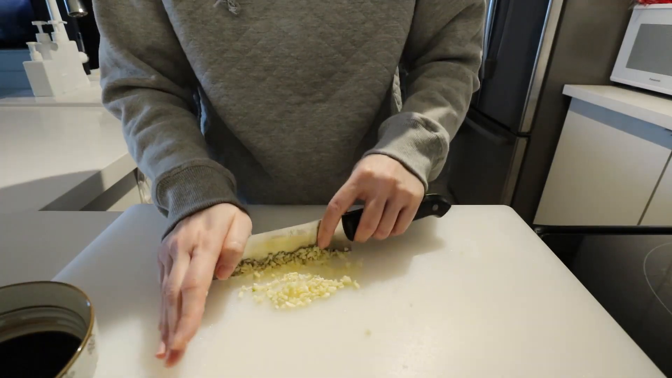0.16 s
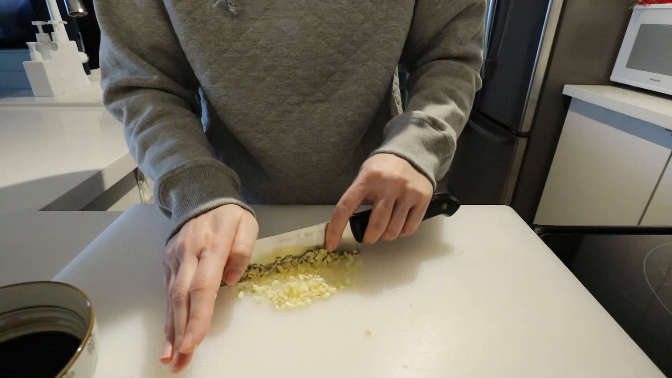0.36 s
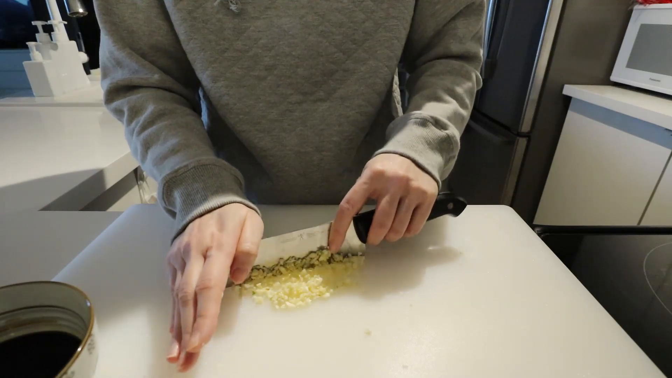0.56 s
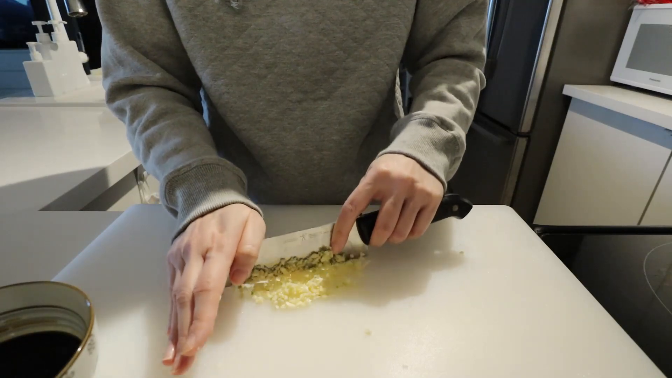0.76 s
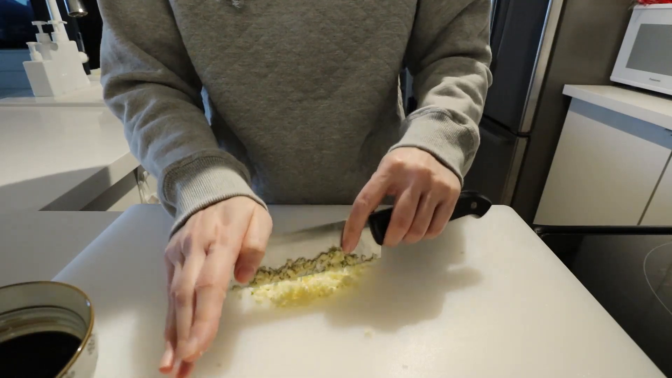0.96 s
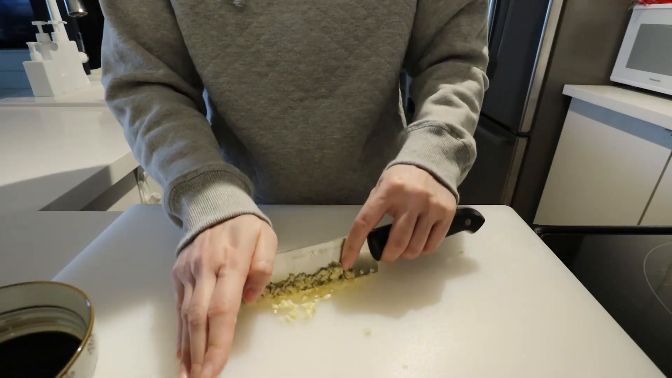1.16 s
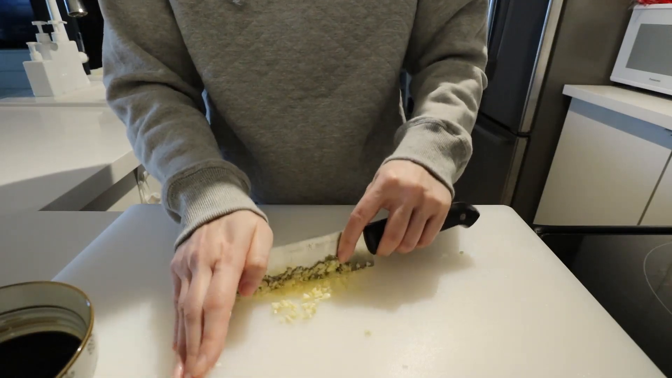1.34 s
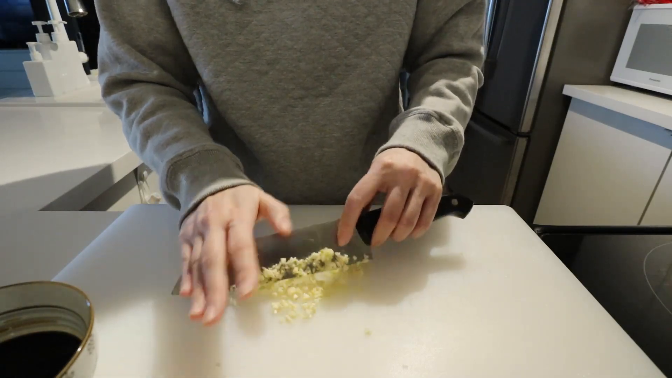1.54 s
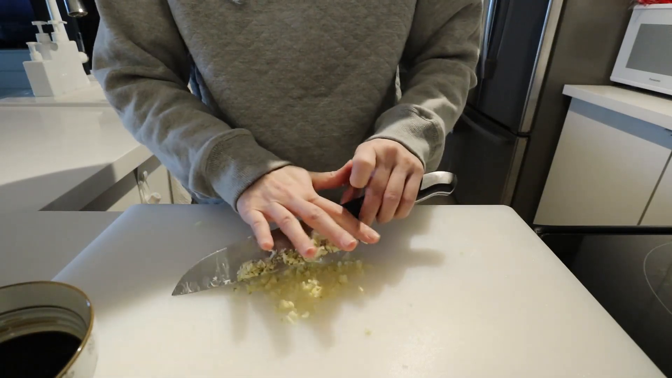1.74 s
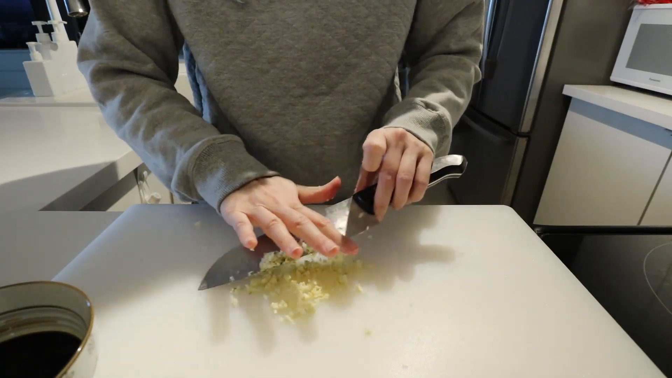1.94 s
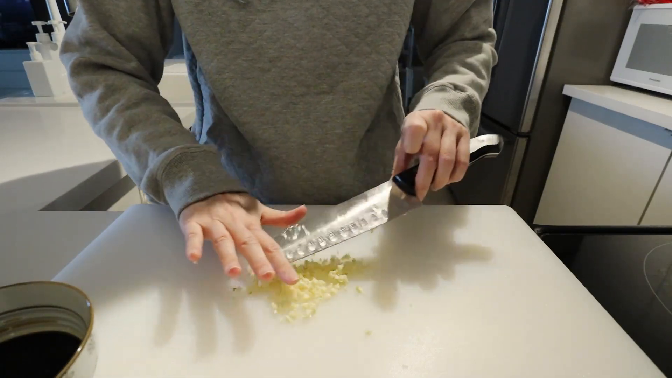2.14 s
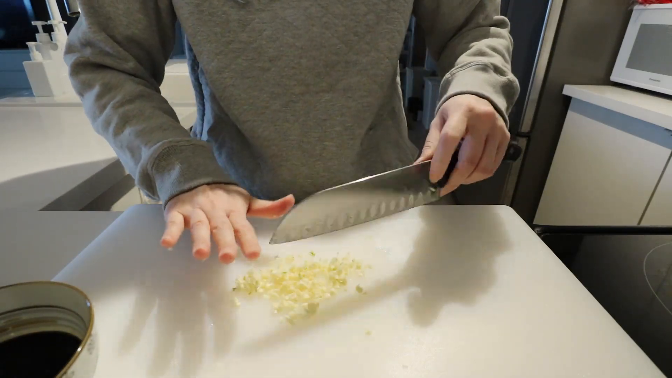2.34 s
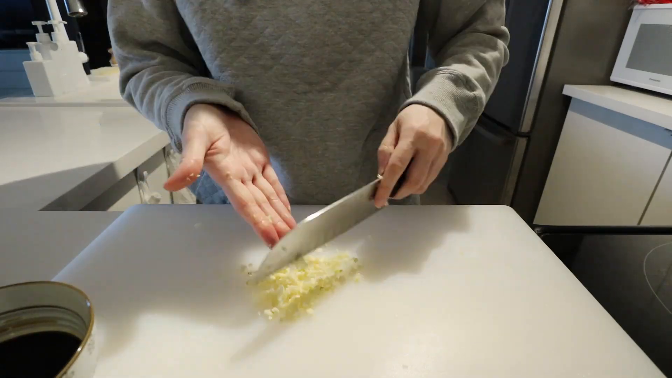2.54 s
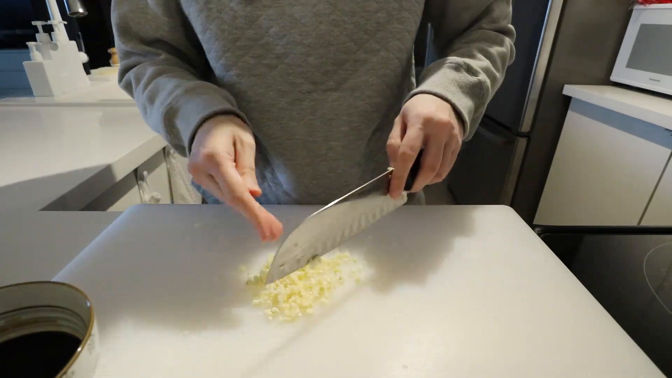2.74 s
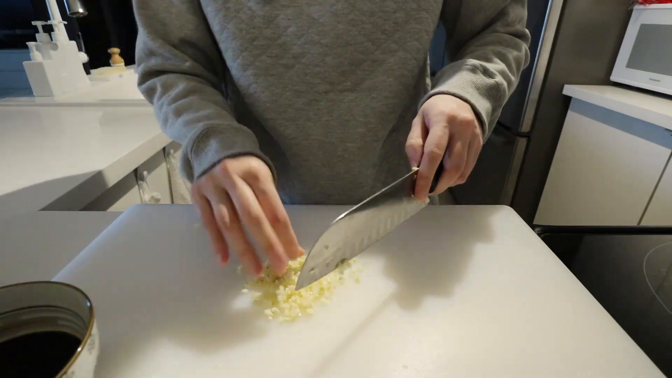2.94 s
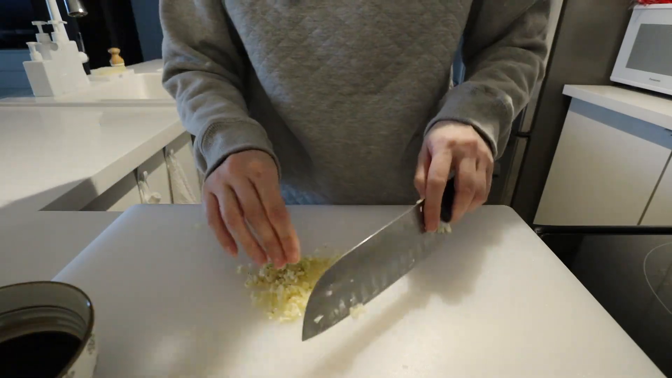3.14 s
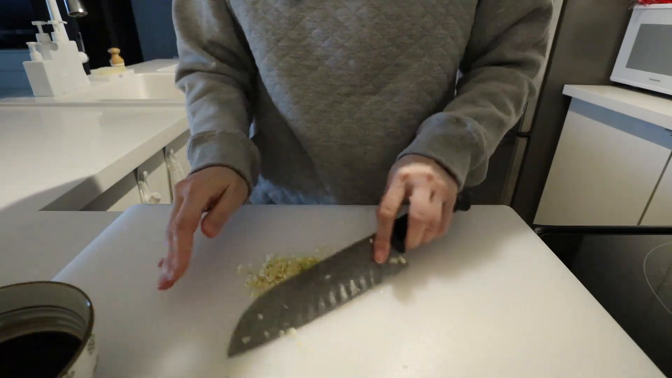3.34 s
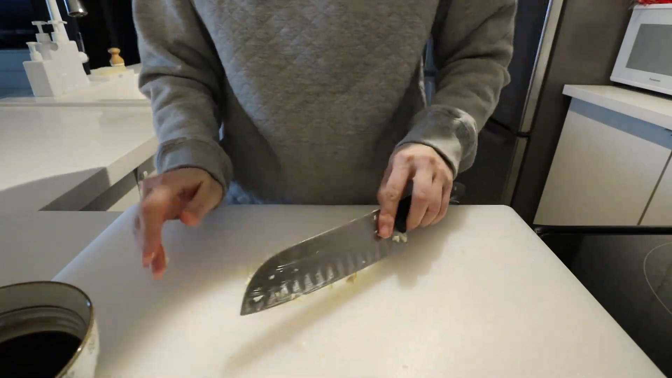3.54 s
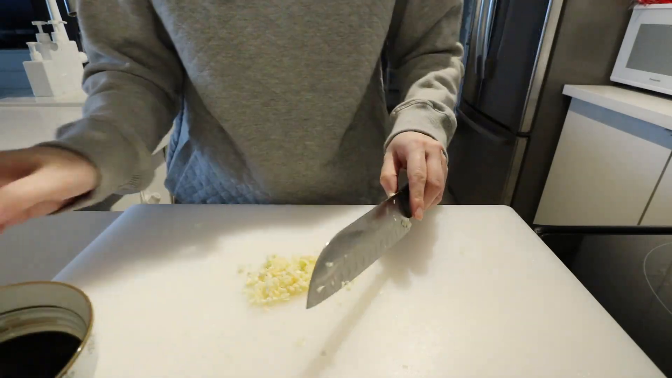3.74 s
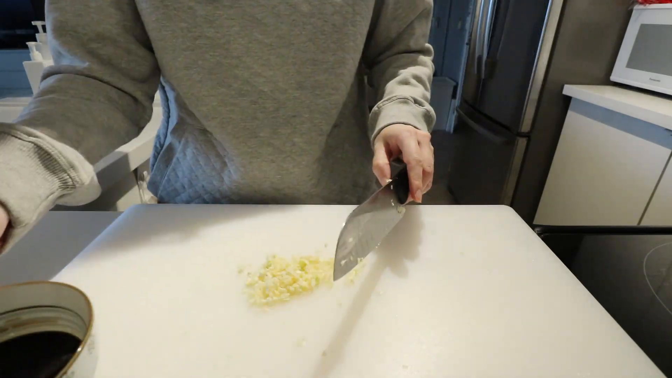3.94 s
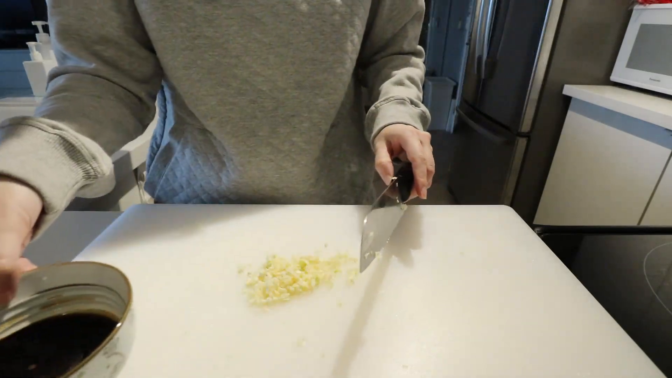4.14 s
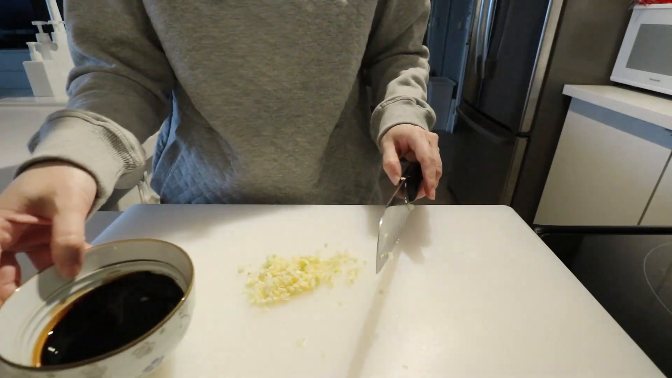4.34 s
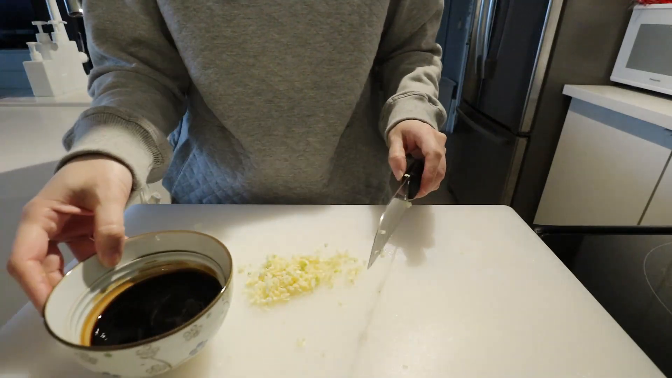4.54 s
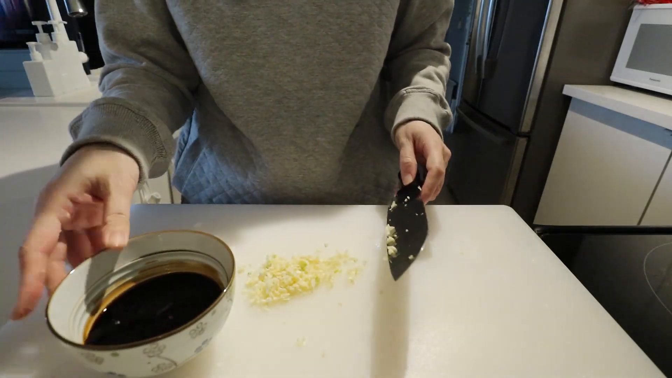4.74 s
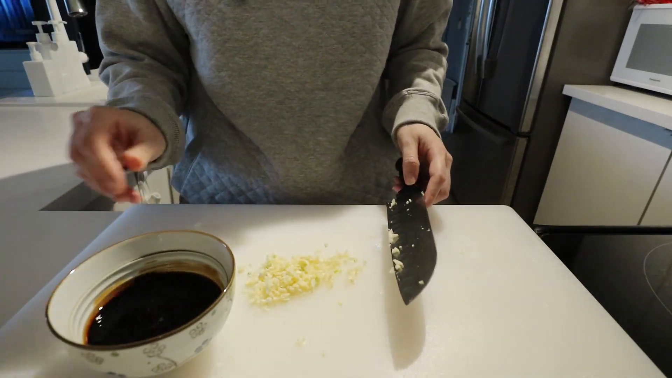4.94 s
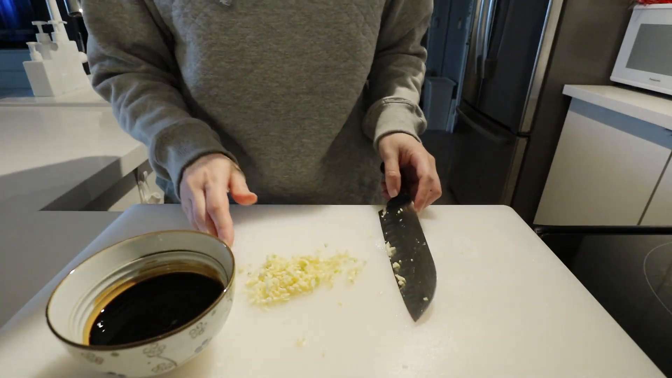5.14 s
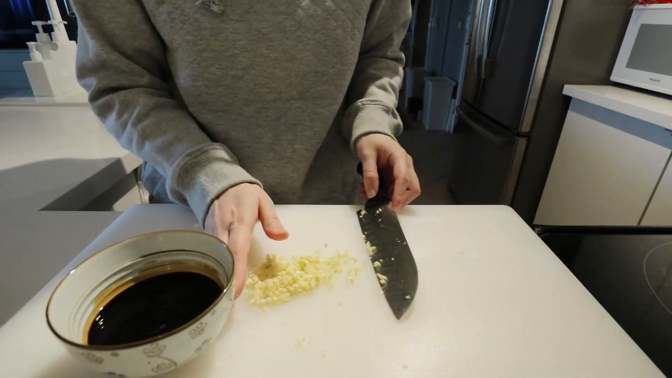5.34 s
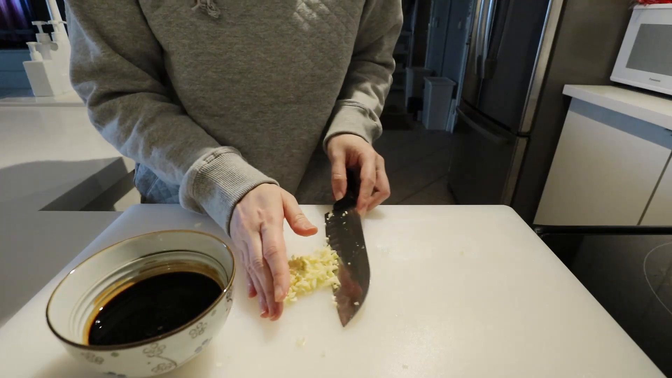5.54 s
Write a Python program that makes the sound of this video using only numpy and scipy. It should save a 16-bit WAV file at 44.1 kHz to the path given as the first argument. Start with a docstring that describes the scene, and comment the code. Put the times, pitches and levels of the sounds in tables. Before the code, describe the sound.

A knife raps sharply through garlic on a cutting board, followed by quiet blade wiping, a bowl scooting over the counter and light scraping.

```python
"""Seven knife chops through garlic on a plastic board in a small kitchen, then a wiped blade and a scraping edge.
A ceramic bowl is dragged over the counter and rings faintly when let go; the knife is set down and sweeps up.
Blows, jolts and thuds excite decaying modes; rubbing is random slips through body modes and a spectrum.
Filtered noise makes taps and air, wavering sines the fridge hum, decaying noise bands the room echo.
A gain control ducks at the hardest blow and slowly comes back."""
import sys
import numpy as np
from scipy import signal
from scipy.fft import rfft, irfft, next_fast_len
from scipy.io import wavfile
from scipy.ndimage import uniform_filter1d, minimum_filter1d

SR = 44100
rng = np.random.default_rng(int(sys.argv[2]) if len(sys.argv) > 2 else 0)


def wav_record(signal):
    """Record a signal, one row per channel, as 16-bit PCM in the file named by sys.argv[1]."""
    frames = np.transpose(np.atleast_2d(signal))
    bounded = np.clip(frames, -1, 1)
    # unit amplitude maps onto the largest positive 16-bit level
    quanta = np.round(bounded * 32767).astype(np.int16)
    wavfile.write(sys.argv[1], SR, quanta)


N = 250929
TIME = np.arange(N) / SR

# knife blows: (time [s], level [dB], contact bandwidth [Hz], garlic crunch level [dB], crunch lead [s])
CHOP_BLOWS = [(0.239, 0.5, 1290, -38.5, 0.0063), (0.414, -1.5, 787, -38.5, 0.0095),
              (0.563, 6.5, 2140, -33.5, 0.0013), (0.7683, 5, 1900, -34.5, 0.00046),
              (1.1088, 2.5, 1540, -40.5, 0.0061), (1.2579, 1.5, 1423, -47.5, 0.0041),
              (1.445, 1, 1435, -39, 0.0049)]
# counter modes: (frequency [Hz], level [dB], t60 [s])
COUNTER_MODES = [(130.6, 2.5, 0.22), (186.8, -1, 0.24), (326.6, 1.5, 0.11), (466, 4, 0.082),
                 (573.5, 4.5, 0.072), (987, 0.5, 0.13), (1249, 1, 0.18), (1594, -7.5, 0.057),
                 (1710, -2, 0.3)]


def undb(db):
    """Decibels to gain."""
    return 10 ** (np.asarray(db) / 20)


def unit(x):
    """Scale to rms 1."""
    return x / np.sqrt(np.mean(x ** 2))


def decay(t, t60):
    """Exponential decay, 60 dB in t60 seconds."""
    return np.exp(-np.log(1000) * t / t60)


def at(points, hz):
    """Read (Hz, value) points on a log-frequency axis."""
    f, value = np.transpose(points)
    return np.interp(np.log(np.maximum(hz, 1)), np.log(f), value)


def colour(x, points):
    """Filter by a (Hz, dB) spectrum."""
    count = x.shape[-1]
    size = next_fast_len(count, True)
    gain = undb(at(points, np.fft.rfftfreq(size, 1 / SR)))
    return irfft(rfft(x, size) * gain, size)[..., :count]


def lowpass(x, order, hz):
    """Butterworth low-pass."""
    return signal.sosfilt(signal.butter(order, hz, fs=SR, output="sos"), x)


def convolve(x, response):
    """Pass sound through an impulse response."""
    return signal.fftconvolve(np.atleast_2d(x), np.atleast_2d(response), axes=-1)[:, :N]


def ring(modes):
    """Quarter-second impulse response of (Hz, dB, t60) modes: a sum of decaying sines."""
    t = TIME[:SR // 4]
    return sum(undb(db) * np.sin(2 * np.pi * hz * t) * decay(t, t60) for hz, db, t60 in modes)


def impulses(rows):
    """Single-sample blows from (s, dB) rows."""
    force = np.zeros(N)
    for s, db in rows:
        force[int(s * SR)] = undb(db)
    return force


def grains(rate, spread_db):
    """Two unrelated streams of tiny random slips, rate per second; spread_db makes a few much larger."""
    slips = np.zeros((2, N))
    chance = rng.random((2, N))
    hit = chance < rate / SR
    # among hits, chance / threshold is uniform, so its -log is exponential
    excess = np.minimum(-np.log(chance[hit] * SR / rate + 1e-12), 4)
    slips[hit] = undb(spread_db * excess) * np.sign(rng.random((2, N))[hit] - .5)
    return unit(slips)


def ports(pair, wide_db=0):
    """Two unrelated sounds as mid and side: the microphones agree in the bass and differ in the treble."""
    # side minus mid: (frequency [Hz], level [dB])
    width = [(60, -38), (200, -20), (600, -11.5), (1300, -6), (2400, -2.5), (4400, 1.5), (8000, 3.5),
             (15000, 3)]
    side = colour(pair[1], width) * undb(wide_db)
    return np.array([pair[0] + side, pair[0] - side])


def rub(slips, modes, ring_db, spectrum):
    """Slips heard directly and through the modes of the rubbed body."""
    ringing = unit(convolve(slips, ring(modes)))
    return unit(colour(slips + undb(ring_db) * ringing, spectrum))


def strokes(rows, attack_s, release_t60, sag_db_per_s=0):
    """Gain of (s, length s, dB) movements: builds, holds or sags at sag_db_per_s, then dies away."""
    power = 0
    for s, length, db in rows:
        t = TIME - s
        sag_db = sag_db_per_s * np.clip(t, 0, length)
        release_db = 60 * np.maximum(t - length, 0) / release_t60
        gain = np.clip(t / attack_s, 0, 1) * undb(db - sag_db - release_db)
        power = power + gain ** 2
    return np.sqrt(power)


def stick_slip(rows, rough, size):
    """Even sticking and slipping sings a rough tone that glides from start to end pitch."""
    out = 0
    for s, length, start_hz, end_hz, db in rows:
        progress = np.clip((TIME - s) / length, 0, 1)
        jitter = rough * unit(uniform_filter1d(rng.standard_normal(N), size=size))
        hz = (start_hz + (end_hz - start_hz) * progress) * (1 + jitter)
        out = out + undb(db) * np.sin(np.pi * progress) * np.sin(2 * np.pi * np.cumsum(hz) / SR)
    return out


def disperse(x):
    """Bending waves arrive at different times for different pitches: all-passes delay bands, none is lost."""
    # slow bands that stretch the knock: (frequency [Hz], width [Hz])
    slow_bands = [(1390, 2600), (992, 110)]
    for hz, width in slow_bands:
        radius = np.exp(-np.pi * width / SR)
        poles = [1, -2 * radius * np.cos(2 * np.pi * hz / SR), radius ** 2]
        x = signal.lfilter(poles[::-1], poles, x)
    return x


def radiate(x, low_hz=65):
    """The board is too small to radiate deep bass."""
    return signal.sosfilt(signal.butter(2, low_hz, "high", fs=SR, output="sos"), x)


def chops(left_db=1.0, place_db=3.5):
    """Each blow rings the board; garlic under the edge cushions the contact and dulls it."""
    # modes of the board lying on the counter: (frequency [Hz], level [dB], t60 [s])
    board_modes = [(75, -42, 0.098), (174, -41.5, 0.28), (316, -55, 0.28), (439, -59, 0.058),
                   (522, -35, 0.17), (861, -24.5, 0.058), (937, -14.5, 0.031), (1142, -14, 0.012),
                   (1331, -9.5, 0.024), (1704, -19, 0.036), (2073, -54, 0.11), (2737, -28, 0.012),
                   (3540, -38, 0.0017), (4140, -18, 0.0062)]
    # bending waves back from the board's edges: (delay [s], share [1])
    edge_returns = [(.00235, 0.2), (.0035, 0.033)]
    arrivals = [(0.00045, 1)] + list(edge_returns)
    board_norm = np.linalg.norm(ring(board_modes))
    out = np.zeros(N)
    for s, db, contact_hz, _, _ in CHOP_BLOWS:
        # each knock's mode levels are varied at random by place_db
        knock = ring([(hz, level + place_db * rng.standard_normal(), t60) for hz, level, t60 in board_modes])
        knock = knock * board_norm / np.linalg.norm(knock)
        knock = disperse(lowpass(knock, 3, contact_hz))
        for delay, share in arrivals:
            start = int((s + delay) * SR)
            out[start:start + len(knock)] += share * undb(db) * knock
    return radiate(out) * undb([[left_db], [-left_db]])


def crunch(fade_s=0.0055):
    """Garlic cells burst ever louder as the edge sinks in, until it meets the board."""
    press = 0
    for s, _, _, db, lead_s in CHOP_BLOWS:
        press = press + undb(db) * np.exp(-np.maximum((s - TIME) / lead_s, (TIME - s) / fade_s))
    spectrum = [(150, -2), (800, 12), (2000, 0.5), (4500, -9), (8000, -16), (15000, -31)]  # (Hz, dB)
    cells = colour(grains(rate=4600, spread_db=4.5), spectrum)
    return ports(unit(cells) * press, wide_db=1.5)


def thuds(hz=85, t60=0.073):
    """The blade breaks through a whole clove and the hand's weight bumps the counter: one deep mode."""
    # (time [s], level [dB])
    bumps = [(0.2364, -33), (0.412, -34)]
    return convolve(impulses(bumps), ring([(hz, 0, t60)]))


def taps(t60=0.054, db=-32):
    """A light touch of blade or fingers sets off a brief clatter: coloured noise that dies away."""
    # (time [s], level [dB])
    touches = [(0.584, -16), (1.889, -25), (1.938, -21), (1.972, -20), (1.993, -21.5), (2.057, -25.5),
               (2.431, -27), (2.464, -33.5), (3.3777, -4.5), (3.386, -7), (3.802, -27.5), (4.475, -15.5),
               (4.576, -16.5), (5.2177, -7.5), (5.2237, -9.5)]
    # (frequency [Hz], level [dB])
    tap_colour = [(120, -13), (300, 1), (800, 3.5), (1400, 1), (2100, -6.5), (2600, -7.5), (3600, -19.5),
                  (5200, -17.5), (7500, -34.5), (11000, -56), (15000, -49)]
    envelope = sum(undb(level) * (TIME >= s) * decay(np.abs(TIME - s), t60) for s, level in touches)
    noise = rng.standard_normal((2, N))
    clatter = colour(noise * envelope, tap_colour) / np.std(colour(noise[0], tap_colour))
    return ports(clatter * undb(db), wide_db=-1.0)


def glide(x, lag_s=0.00104, swing=0.19, swing_hz=2.6, share=0.29):
    """The board mirrors the moving blade; a slowly swinging delay sweeps resonances through the rasp."""
    path_s = lag_s * (1 + swing * np.sin(2 * np.pi * swing_hz * TIME))
    mirrored = np.array([np.interp(TIME - path_s, TIME, row) for row in x])
    return (x + share * mirrored) / np.hypot(1, share)


def blade_work():
    """Skin, board and garlic stick and slip along the steel, exciting its modes."""
    # blade in the air, blade pressed on the board: (frequency [Hz], level [dB], t60 [s])
    free_modes, pressed_modes = [(507, 6.5, 0.13), (780, -1, 0.031), (1924, 2.5, 0.058), (2990, -1, 0.041),
                                 (2123, 2, 0.063), (2470, 4, 0.069), (2495, -1.5, 0.1), (3660, -26, 0.12),
                                 (4730, 2, 0.069), (5330, 2, 0.059), (6400, -5, 0.047), (7420, 2, 0.053),
                                 (8930, 0, 0.059)], [(590, -0.5, 0.045), (1220, -3, 0.09), (1470, -3, 0.1),
                                                (1700, -3, 0.015), (1950, 0, 0.013), (2065, -2.5, 0.068),
                                                (3475, -34, 0.021), (3684, -0.5, 0.11), (4200, -14, 0.11),
                                                (4260, -1.5, 0.19), (4760, 1, 0.021), (5250, 7, 0.014),
                                                (6680, 5.5, 0.024)]
    # (frequency [Hz], level [dB])
    wipe_colour, scrape_colour = [(200, -52), (480, 1.5), (800, 2.5), (1100, -4), (2200, -4.5), (3200, 1.5),
                                  (5000, -4), (8000, -8), (11000, -12), (15500, -25)], [(200, -5.5), (450, -18.5), (600, 2), (1050, -12),
                                                       (1450, 0), (2150, -2), (2800, -12), (3800, -8),
                                                       (6400, -11.5), (10000, -18), (15500, -36)]
    sweep_colour = [(180, -17), (300, -1), (403, -1.5), (515, 5), (627, 0.5), (841, 4.5), (1090, -7),
                    (1330, 4.5), (1590, -8), (1790, 1.5), (2920, -14.5), (4540, -13), (6730, -21.5),
                    (15000, -47)]
    # finger wipes, two skips and a scrape, pushes on the pile: (time [s], length [s], level [dB])
    wipes, scrapes, sweeps = [(2.508, 0.084, -43.5)], [(3.378, 0.017, -43), (3.4, 0.0054, -40.5), (3.421, 0.075, -36)], [(5.312, 0.035, -49), (5.415, 0.077, -45),
                                                              (5.532, 0.071, -44.5), (5.64, .05, -51.5)]
    wipe = rub(grains(rate=3500, spread_db=3.5), free_modes, ring_db=0, spectrum=wipe_colour)
    scrape = rub(grains(rate=2500, spread_db=3.5), pressed_modes, ring_db=-4, spectrum=scrape_colour)
    sweep = rub(grains(rate=2000, spread_db=0.0), pressed_modes, ring_db=-22, spectrum=sweep_colour)
    wipe = wipe * strokes(wipes, attack_s=0.023, release_t60=0.11)
    scrape = scrape * strokes(scrapes, attack_s=0.0054, release_t60=0.076, sag_db_per_s=125.5)
    sweep = sweep * strokes(sweeps, attack_s=0.018, release_t60=0.55)
    return ports(wipe + glide(scrape + sweep), wide_db=-2.0)


def squeaks():
    """Damp skin sticks and slips on the steel in short falling tones."""
    # (time [s], length [s], start [Hz], end [Hz], level [dB])
    squeak_rows = [(2.2, 0.059, 3350, 2630, -68), (2.204, 0.045, 2330, 1890, -66),
                   (2.335, 0.026, 4210, 3470, -71)]
    return stick_slip(squeak_rows, rough=0.044, size=60)


def fingers():
    """Damp garlic crackles under the fingers, and their tips swish over the board."""
    # picking at garlic, sliding round the pile: (time [s], length [s], level [dB])
    picks, slides = [(.25, .3, -81.5), (1.91, .16, -65.5), (2.12, 0.11, -73), (2.41, 0.27, -69.5),
                     (3.26, 0.059, -68)], [(2.78, 0.13, -68.5)]
    # (frequency [Hz], level [dB])
    crackle_colour, slide_colour = [(400, 8.5), (900, 15.5), (2500, -1), (5000, -1.5), (8000, -6),
                                    (14000, -22.5)], [(400, -14.5), (800, 1.5), (1100, -16),
                                                             (1600, 7.5), (2200, -10.5), (2850, -4.5),
                                                             (4000, -23), (14000, -31.5)]
    crackle = unit(colour(grains(rate=800, spread_db=3.5), crackle_colour))
    swish = unit(colour(grains(rate=1700, spread_db=0), slide_colour))
    crackle = crackle * strokes(picks, attack_s=0.056, release_t60=0.39)
    swish = swish * strokes(slides, attack_s=0.079, release_t60=1.3)
    return ports(crackle + swish, wide_db=-2.5)


def bowl():
    """The dragged foot judders and booms in the counter; the rim sings as the finger slides off."""
    # pulls over the counter: (time [s], length [s], level [dB])
    pulls = [(4.1, 0.23, -35), (4.36, 0.069, -37.5), (4.485, 0.027, -37)]
    # (frequency [Hz], level [dB])
    drag_colour = [(35, -36.5), (75, -18), (125, -7.5), (200, 1), (260, -7), (400, -16.5), (570, -12.5),
                   (700, -17.5), (1100, -32.5), (1400, -21), (1900, -28), (2700, -42.5), (5000, -58.5),
                   (12000, -83)]
    # stick-slip, faster as the foot gains speed: (time [s], length [s], start [Hz], end [Hz], level [dB])
    judders = [(4.12, .26, 154.4, 206.6, -39.5), (4.36, 0.288, 75.7, 99, -39.5)]
    # rim modes: (frequency [Hz], start [s], swell [s], level [dB], t60 [s])
    rim_modes = [(1660, 4.772, 0.0055, -58, 0.41), (1611, 4.81, 0.044, -57, 1.0),
                 (3984, 4.77, 0.012, -74.5, 0.23), (4000, 4.827, 0.0021, -62.5, 0.26),
                 (7000, 4.785, 0.017, -74.5, 0.11), (10600, 4.77, 0.017, -81, 0.15)]
    drag = rub(grains(rate=1600, spread_db=1.5), COUNTER_MODES, ring_db=-11.5, spectrum=drag_colour)
    drag = drag * strokes(pulls, attack_s=0.05, release_t60=0.55)
    judder = stick_slip(judders, rough=0.1053, size=200)
    rim = 0
    for hz, s, swell_s, db, t60 in rim_modes:
        shape = np.clip((TIME - s) / swell_s, 0, 1) * decay(np.maximum(TIME - s - swell_s, 0), t60)
        rim = rim + undb(db) * shape * np.sin(2 * np.pi * hz * (TIME - rim_modes[0][1]))
    return ports(drag, wide_db=-3.5) + judder + rim


def jolts(db=-41, push_hz=240):
    """The bowl's foot catches and jumps: each soft blow booms in the counter."""
    # (time [s], level [dB])
    jumps = [(4.084, 5.5), (4.127, -6), (4.157, -9), (4.197, 1.5), (4.23, -7), (4.41, -1), (4.511, 7)]
    boom = ring([(hz, level, t60 / 2) for hz, level, t60 in COUNTER_MODES])  # decays twice as fast
    return convolve(impulses(jumps) * undb(db), lowpass(boom, 2, push_hz))


def sleeves():
    """Soft, dull friction of hands and cloth brushing the board."""
    # (time [s], length [s], level [dB])
    brushes = [(.065, 0.21, -47.5), (.28, 0.36, -47.5), (4.77, .06, -61), (5.22, 0.062, -50.5),
               (5.365, 0.042, -45), (5.5, 0.019, -49), (5.63, 0.048, -73)]
    # (frequency [Hz], level [dB])
    brush_colour = [(40, -0.5), (100, 2.5), (200, 9.5), (330, -9), (550, -14.5), (1000, -19), (2000, -39.5),
                    (6000, -43), (14000, -63)]
    friction = unit(colour(grains(rate=520, spread_db=1.5), brush_colour))
    return ports(friction * strokes(brushes, attack_s=0.018, release_t60=.55))


def background(air_db=-55, hum_width_hz=3):
    """Room air as coloured noise, and fridge lines that waver slightly in level and phase."""
    # air spectrum, fridge lines: (frequency [Hz], level [dB])
    room_tone, hum_lines = [(12, -44.5), (20, 2.5), (54, -3.5), (157, -4.5), (225, -4.5), (274, -11.5),
                            (362, -25), (439, -10.5), (565, -21.5), (725, -14.5), (1010, -28), (1630, -27),
                            (2090, -35.5), (2840, -37), (15500, -62.5)], [(57, -59), (115, -62.5), (213, -57), (425, -74)]
    air = unit(colour(rng.standard_normal((2, N)), room_tone))
    air = ports(air, wide_db=5) * undb(air_db)
    slow = [(hum_width_hz, 0), (10 * hum_width_hz, -50), (1000, -120)]  # (Hz, dB)
    hum = 0
    for hz, db in hum_lines:
        waver = unit(colour(rng.standard_normal(N), slow))
        line = np.sin(2 * np.pi * hz * TIME + 0.72 * waver[::-1])
        hum = hum + undb(db) * np.sqrt(2) * (1 + 0.27 * waver) * line
    return air + hum


def kitchen(x, gap_s=0.001, early_db=4, early_s=0.0078):
    """Strong early echoes from counter and cupboards, then a diffuse tail, longest around 1 to 2 kHz."""
    # decay time, short in the bass and again at the top: (frequency [Hz], t60 [s])
    room_t60 = [(100, 0.18), (400, 0.17), (1000, 0.46), (2000, .5), (5000, .38), (14000, 0.2)]
    # echo gain: (frequency [Hz], level [dB])
    room_colour = [(80, -8.5), (300, -6), (500, -7.5), (640, -6), (900, -8), (1600, -14), (2300, -6.5),
                   (8000, -15.5), (15000, -18.5)]
    t = TIME[:SR]
    noise = rfft(ports(rng.standard_normal((2, SR)), wide_db=-1))
    centres = np.geomspace(60, 16000, num=9)
    hz = np.fft.rfftfreq(SR, 1 / SR)
    build = np.clip(t / gap_s - 1, 0, 1) * (1 + undb(early_db) * np.exp(-t / early_s))
    response = 0
    # overlapping noise bands, each with its own decay
    for centre, weights in zip(centres, np.eye(len(centres))):
        envelope = build * decay(t, at(room_t60, centre))
        band = irfft(noise * at(np.c_[centres, weights], hz), SR)
        response = response + band * envelope / np.linalg.norm(envelope)
    return convolve(x, colour(response, room_colour))


def gain_control(x, limit_db=-16, start_cut_db=5, hold_s=1.03, recover_db_per_s=6):
    """Short-term level over the limit turns the gain down at once; it holds, then creeps back."""
    power = uniform_filter1d(np.mean(x ** 2, axis=0), size=220)
    cut_db = np.maximum(10 * np.log10(np.maximum(power, 1e-12)) - limit_db, 0)
    cut_db[0] = start_cut_db  # already turned down at the start
    half = int(hold_s * SR / 2)
    # running maximum over the hold time
    held_db = -minimum_filter1d(-cut_db, 2 * half + 1, origin=half, mode="nearest")
    # fall no faster than the recovery slope
    recovery_db = recover_db_per_s * TIME
    cut_db = np.maximum.accumulate(held_db + recovery_db) - recovery_db
    return x * undb(-uniform_filter1d(cut_db, size=64))


def scene(chop_echo_db=-1.0, crunch_echo_db=-6, work_echo_db=-1, board_top_hz=1800):
    """Everything happens on the counter just in front of the microphone."""
    blows, cells = chops(), crunch()
    work = taps() + blade_work() + fingers() + squeaks() + bowl() + jolts() + sleeves()
    # the board's knock fills the room; the crack of the edge stays close
    knock = lowpass(blows.mean(axis=0), 4, board_top_hz)
    send = undb(chop_echo_db) * knock + undb(crunch_echo_db) * cells[0] + undb(work_echo_db) * work[0]
    return blows + cells + thuds() + work + kitchen(send) + background()


def record(dry, ceiling=0.33, top_hz=15700):
    """After the gain control the loudest peaks are rounded and the top is cut."""
    x = gain_control(dry)
    rounded = x / (1 + (x / ceiling) ** 4) ** (1 / 4)
    return signal.sosfilt(signal.ellip(8, .2, 70, top_hz, fs=SR, output="sos"), rounded)


dry = scene()
out = record(dry)
wav_record(out)
```